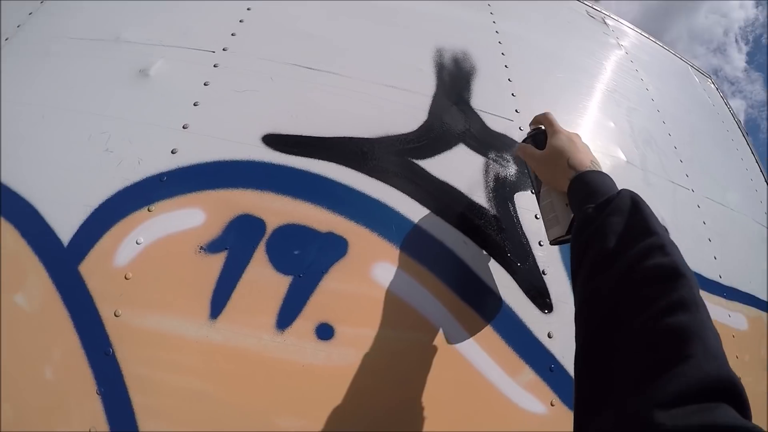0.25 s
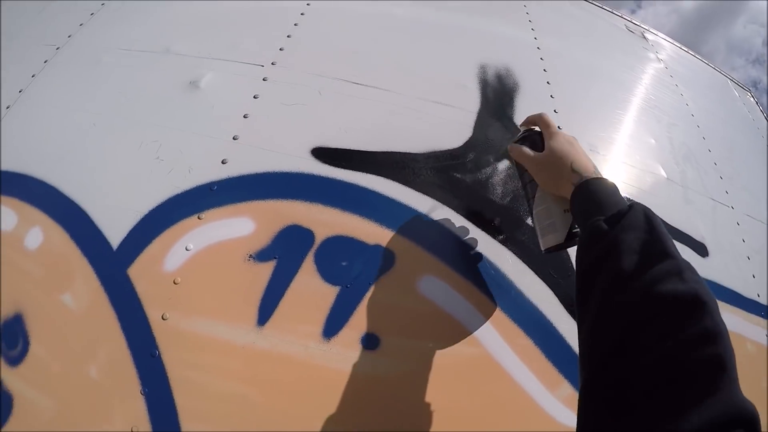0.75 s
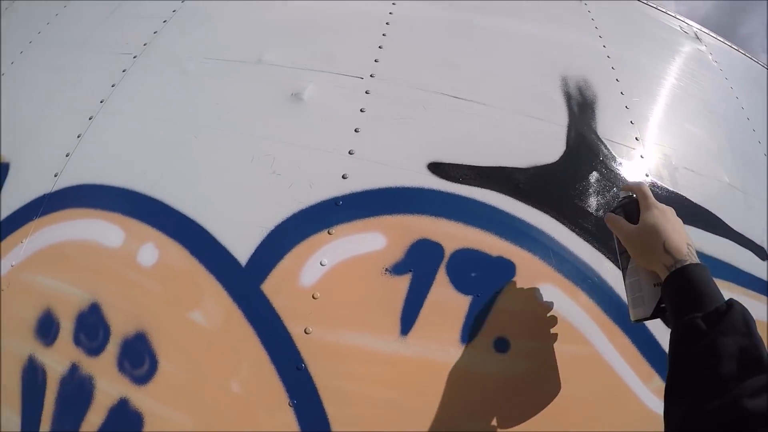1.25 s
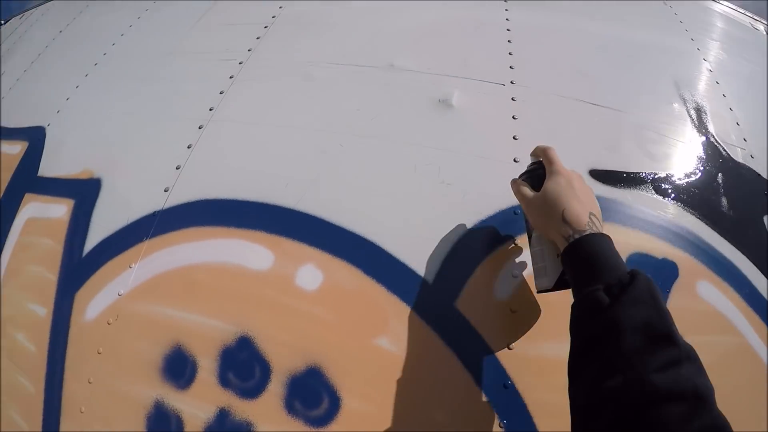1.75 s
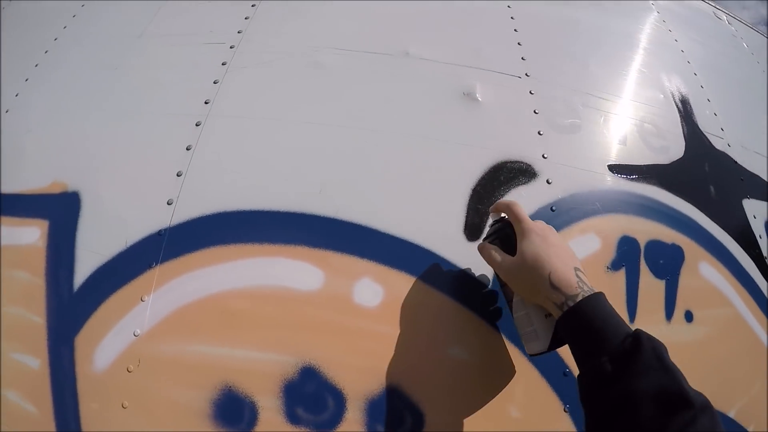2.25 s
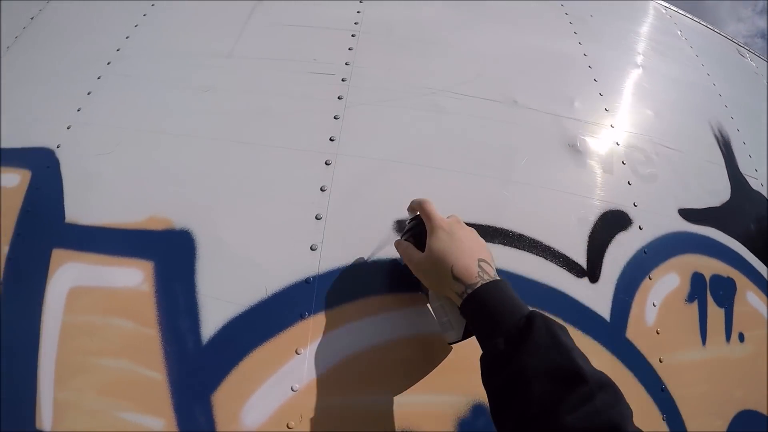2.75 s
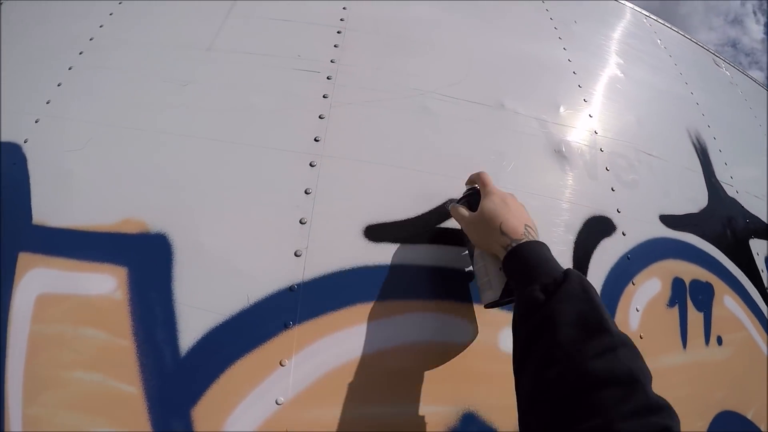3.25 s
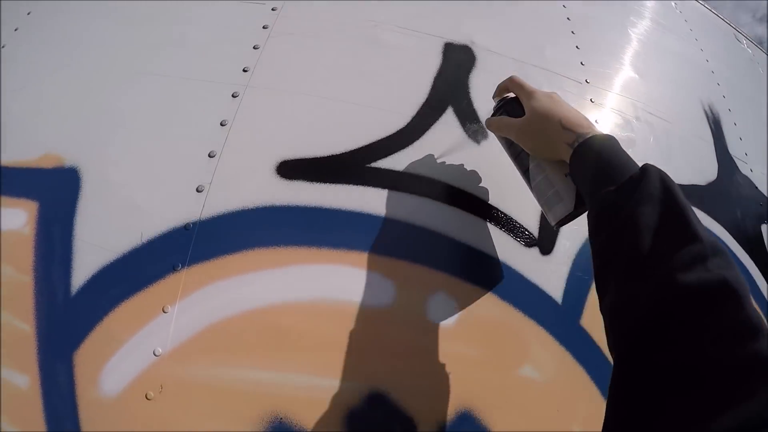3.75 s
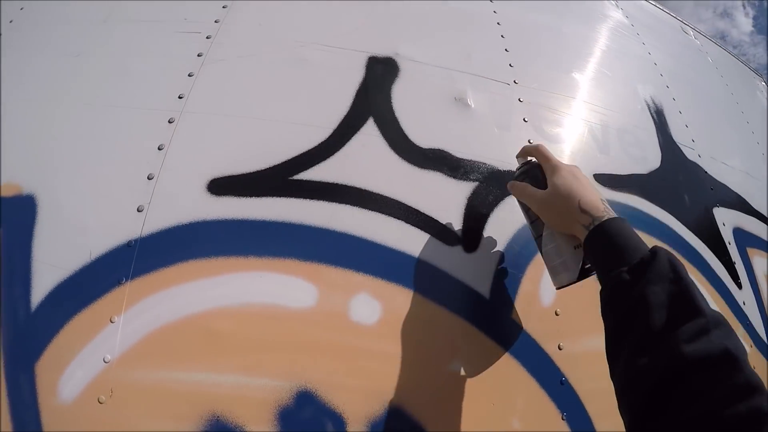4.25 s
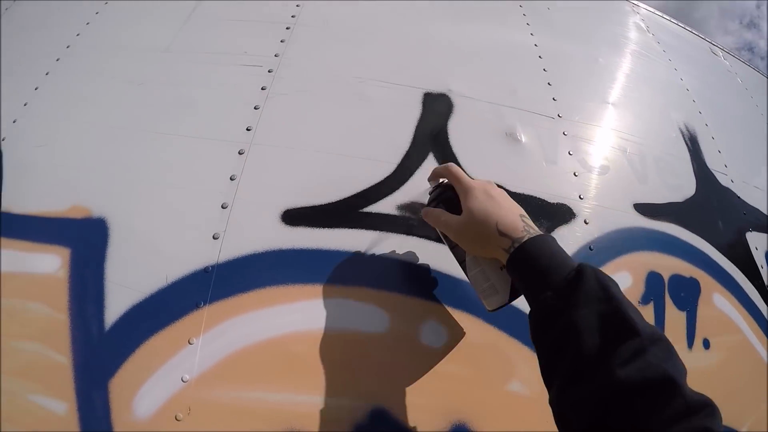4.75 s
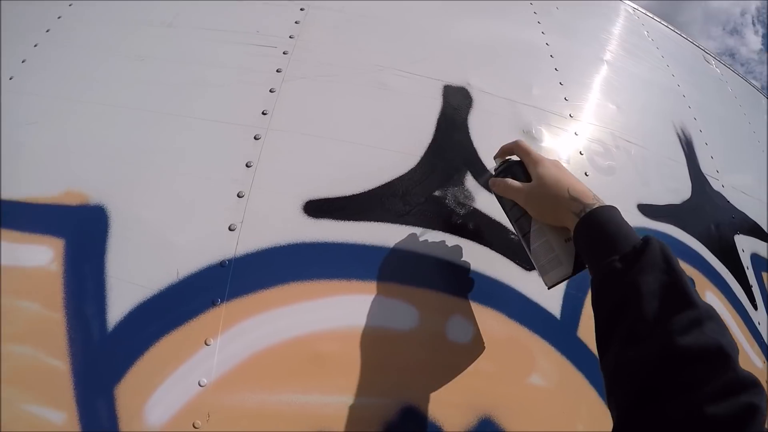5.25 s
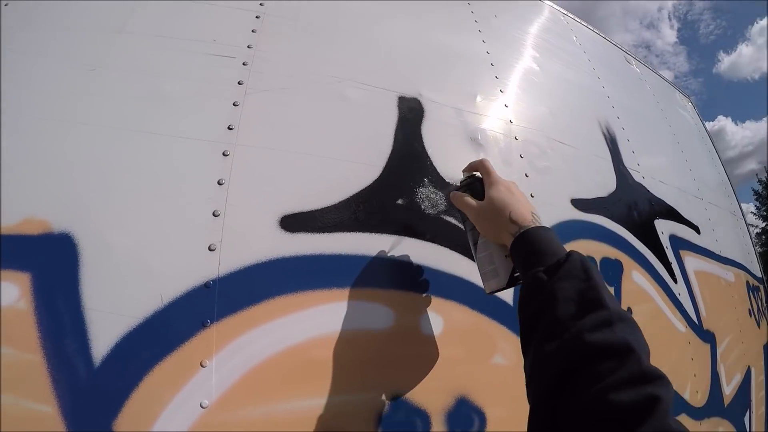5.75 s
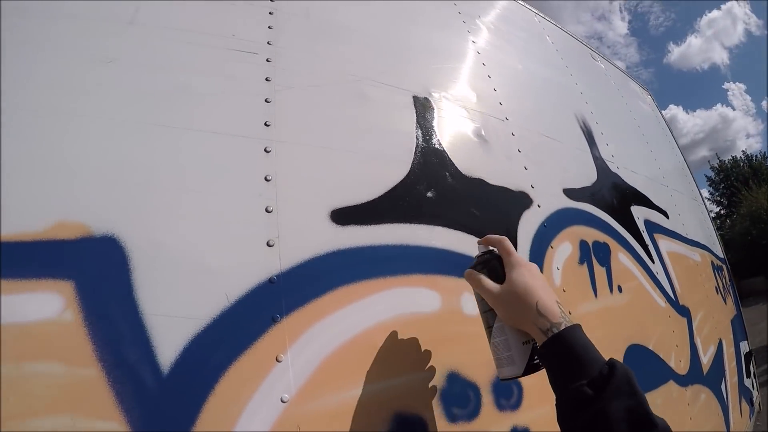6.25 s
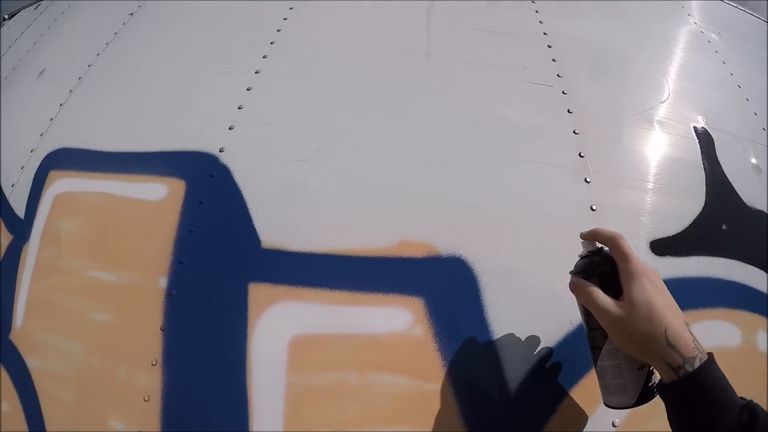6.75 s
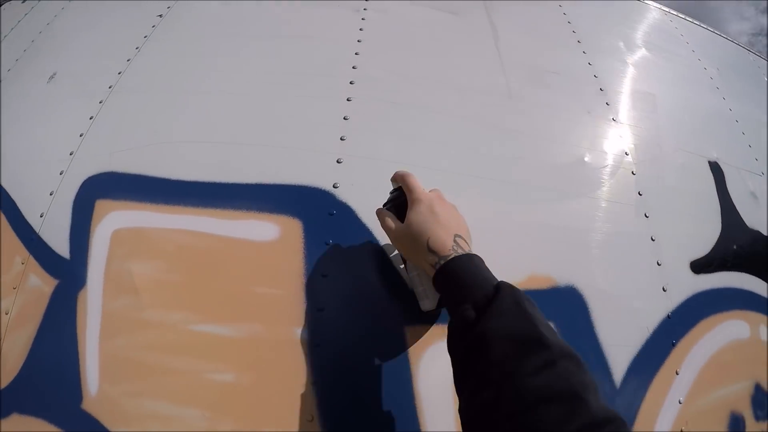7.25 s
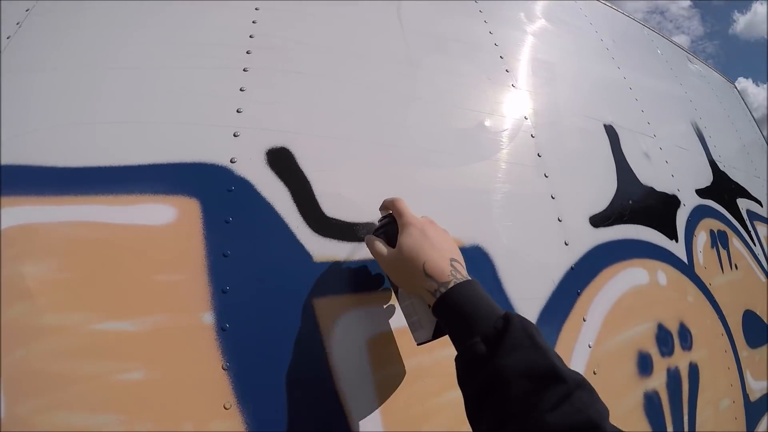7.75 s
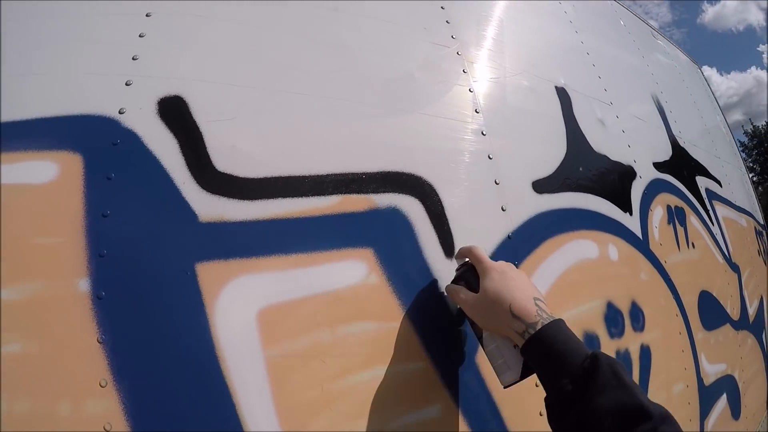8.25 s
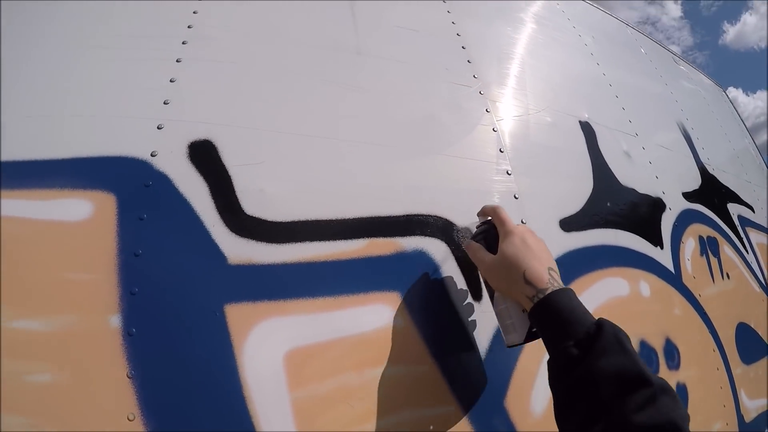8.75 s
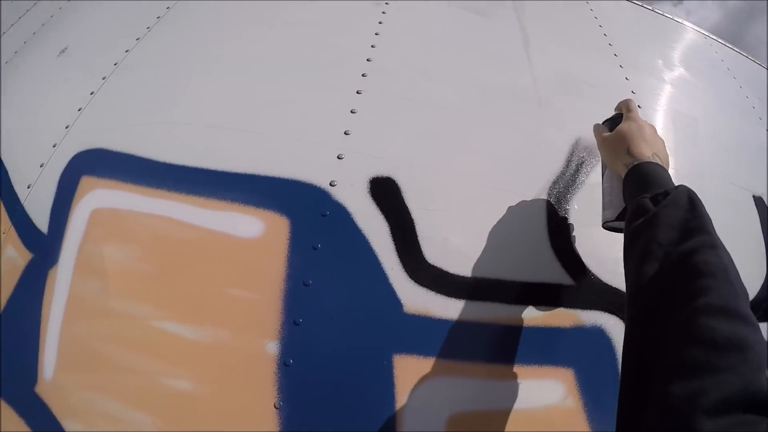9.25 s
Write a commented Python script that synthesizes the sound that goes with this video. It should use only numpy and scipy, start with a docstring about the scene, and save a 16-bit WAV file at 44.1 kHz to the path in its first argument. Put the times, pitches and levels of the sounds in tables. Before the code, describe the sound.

Repeated hisses of spray paint against a metal wall, with light can rattles and wind rumbling on the microphone.

```python
"""A spray can hisses in seven strokes, its turbulent jet close to a sheet-metal wall.
Echoes off wall, hand, arm and body interfere with the direct hiss and colour it as the hand moves.
The mixing ball strikes the can and excites the modes of its shell. All is heard by a small camera
in a resonant, closed housing, on which wind rumbles and two soft bumps land, over a faint outdoor wash."""
import sys
import numpy as np
from scipy import signal
from scipy.fft import rfft, irfft, next_fast_len
from scipy.io import wavfile
from scipy.ndimage import uniform_filter1d, map_coordinates

SR = 44100
rng = np.random.default_rng(int(sys.argv[2]) if len(sys.argv) > 2 else 0)


def pcm_store(signal):
    """Save signal as 16-bit PCM."""
    levels = np.round(np.clip(np.atleast_2d(signal), -1, 1) * 32767)
    wavfile.write(sys.argv[1], SR, levels.astype(np.int16).T)


N = 419832
FRAME = 512  # samples per short-time spectrum

# Strength of the wind's buffeting: (time [s], level [dB])
GUSTS = [(0.0, -36), (1.59, -32.5), (1.72, -25.5), (1.99, -25.5), (2.01, -36), (2.38, -32.5), (3.29, -37),
         (3.34, -26), (4.4, -37.5), (6.34, -33), (6.389, -20), (6.81, -38.5), (7.08, -21), (7.19, -33.5),
         (7.5, -30.5), (8.99, -42), (9.25, -22.5), (9.52, -34.5)]


def amp(db):
    """Decibels to amplitude ratio."""
    return 10 ** (np.asarray(db) / 20)


def unit(x):
    """Normalisation to an rms of 1."""
    return x / np.sqrt(np.mean(x ** 2) + 1e-20)


def along(points, hz):
    """Interpolation of (frequency [Hz], value) points on a logarithmic frequency axis."""
    f, v = np.transpose(points)
    return np.interp(np.log(hz + 1), np.log(f + 1), v)


def curve(s, values):
    """Linear interpolation in time, one value per sample."""
    return np.interp(np.arange(N) / SR, s, values)


def wobble(rate):
    """Spline interpolation of random knots, `rate` of them a second."""
    return map_coordinates(rng.standard_normal(int(N * rate / SR) + 4), [np.arange(N) * rate / SR])


def filtered(x, response):
    """Linear filtering: the spectrum of x times a frequency response."""
    m = 2 * next_fast_len(N // 2 + 4096)
    return irfft(rfft(x, m) * response(np.fft.rfftfreq(m, 1 / SR)), m)[..., :N]


def causal(gain):
    """Minimum-phase response with this gain: it rings only after its excitation."""
    cepstrum = irfft(np.log(gain + 1e-6))
    cepstrum[1:len(cepstrum) // 2] *= 2
    cepstrum[len(cepstrum) // 2 + 1:] = 0
    return np.exp(rfft(cepstrum))[:len(gain)]


def patchy_noise(depth_db, bins, frames):
    """Short-time spectrum of noise, amplitude-modulated in random patches of time and frequency."""
    hz, t, spectrum = signal.stft(rng.standard_normal(N), SR, nperseg=FRAME)
    field = rng.standard_normal(spectrum.shape)
    for _ in range(2):
        field = uniform_filter1d(uniform_filter1d(field, bins, 0), frames, 1)
    return hz, t, spectrum * amp(depth_db * unit(field))


def echo(hz, delay_ms):
    """A delay is a phase lag proportional to frequency; one column per delay."""
    return np.exp(-2j * np.pi * hz[:, None] * delay_ms / 1000)


def housing(hz):
    """Resonances and antiresonances of the camera housing lift or thin the sound around them."""
    # Peaks and dips: (centre [Hz], width [Hz], gain [dB])
    resonances = [(1600, 195, 11.5), (2160, 60, -22), (2366, 122, 9.5), (3128, 122, -10.5),
                  (4175, 170, -9.5), (4546, 63, 6), (4750, 195, -9.5), (5214, 82, -21), (5280, 230, 9.5),
                  (5820, 940, -7.5), (7740, 540, 6.5), (11100, 180, 6)]
    return amp(sum(db / (1 + (2 * (hz - centre) / width) ** 2) for centre, width, db in resonances))


def reflections(hz, t):
    """Comb filtering: short echoes interfere with the direct sound, and the notches move with the hand."""
    # Wall echo as the nozzle nears, leaves and turns: (time [s], delay [ms], treble amplitude [ratio])
    wall_path = [(0, 0.27, 0.27), (.18, 0.37, 0.47), (.4, 0.41, 0.65), (1.12, .43, 0.47),
                 (1.97, 0.39, 0.36), (2.18, 0.41, 0.077), (2.5, 0.18, 0.58), (2.65, 0.24, 0.35),
                 (2.85, 0.29, 0.6), (3.15, 0.29, 0.79), (3.38, 0.19, .3), (3.48, 0.31, 0.3),
                 (4.11, 0.31, 0.95), (4.39, 0.35, 0.27), (4.6, 0.378, 0.8), (4.9, 0.4, 0.78),
                 (5.07, 0.35, 0.26), (5.2, 0.39, 0.26), (5.5, 0.41, 0.5), (5.7, 0.518, 0.97),
                 (5.95, 0.33, 0.48), (7.5, 0.46, 0.52), (7.64, 0.26, 0.55), (8.15, 0.28, 0.56),
                 (8.31, .19, .75), (8.78, 0.27, 0.56), (9.1, 0.23, 0.18), (9.3, 0.45, .02), (9.52, .48, 1)]
    # Echo off the hand that holds the can: (time [s], delay [ms], amplitude [ratio])
    hand_path = [(0, 0.16, 0.13), (2.85, .14, 0.19), (3.33, 0.14, .05), (3.38, 0.051, 0.14),
                 (3.56, 0.087, 0.28), (3.66, 0.18, 0.24), (4.11, 0.16, 0.32), (4.39, 0.55, 0.28),
                 (5.07, 0.51, 0.2), (5.2, 0.41, 0.28), (5.5, 0.45, 0.17), (5.7, 0.14, .02),
                 (5.95, .12, 0.37), (7.5, 0.092, 0.26), (8.31, .135, 0.18), (9.15, 0.088, 0.032),
                 (9.42, 0.11, 0.38)]
    at = np.clip(np.round(t * SR).astype(int), 0, N - 1)
    wall_s, *wall_columns = np.transpose(wall_path)
    wall_ms, wall_share = (np.interp(t, wall_s, column) for column in wall_columns)
    wall_ms += 0.008 * wobble(7)[at]  # hand tremor
    hand_s, *hand_columns = np.transpose(hand_path)
    hand_ms, hand_share = (np.interp(t, hand_s, column) for column in hand_columns)
    shade = 1 / (1 + (2200 / (hz[:, None] + 1)) ** 2)  # the hand shades the wall echo's long waves
    paths = 1 + wall_share * shade * echo(hz, wall_ms) + hand_share * echo(hz, hand_ms)
    treble = 1 / (1 + (5000 / (hz[:, None] + 1)) ** 4)
    # Arm and body return only short waves, over longer paths that drift.
    for mean_ms, sway_ms, share in [(0.68, 0.03, 0.25), (0.85, 0.04, 0.24), (1.3, 0.06, 0.22)]:
        paths += share * treble * echo(hz, mean_ms + sway_ms * wobble(3)[at])
    return paths


def spray():
    """A turbulent jet radiates broadband noise while the valve is open; echoes and housing colour it."""
    # Jet spectrum: (frequency [Hz], relative spectral level [dB])
    nozzle = [(710, -39), (1200, -33), (3630, 0.5), (5870, -4.5), (7660, -9), (15300, -13)]
    # Valve timing of each stroke: (fully open [s], shuts [s])
    valve = [(-.05, 1.128), (1.965, 2.182), (2.499, 2.845), (3.149, 4.11), (4.386, 5.955), (7.508, 8.31),
             (8.776, 10)]
    # Each stroke: (press duration [s], start level [dB], end level [dB], tilt [dB/octave])
    strokes = [(.027, -47, -46, 0), (0.052, -48, -45.5, 0), (0.032, -46, -47.5, 0),
               (0.033, -47.5, -47, -0.8), (0.026, -46.5, -47.5, 0.5), (0.023, -47, -46.5, -0.8),
               (0.049, -44, -52, 0.2)]
    open_s, shut_s = np.transpose(valve)
    press_s, start_db, end_db, tilt_db = np.transpose(strokes)
    hz, t, noise = patchy_noise(depth_db=1.0, bins=5, frames=24)
    stroke = np.clip(np.searchsorted(shut_s + 0.1, t), 0, len(strokes) - 1)
    tilt = amp(np.log2(np.clip(hz[:, None], 1500, None) / 5000) * tilt_db[stroke])
    jet = signal.istft(noise * reflections(hz, t) * tilt, SR, nperseg=FRAME)[1][:N]
    jet = unit(filtered(jet, lambda f: amp(along(nozzle, f)) * housing(f)))
    now, flow = np.arange(N) / SR, 0
    for full, press, shuts in zip(open_s, press_s, shut_s):
        travel = (now - full) / press
        opening = amp(21 * np.minimum(travel, 0)) * (travel > -1.4)  # a leak swells into the jet
        closing = np.clip((shuts - now) / 0.03 + 0.7, 0, 1) ** 2
        flow += opening * closing
    level_db = curve(np.ravel(valve), np.ravel([start_db, end_db], "F"))
    sputter_db = 0.8 * wobble(60) + 0.8 * wobble(18)  # droplets make the flow uneven
    return jet * flow * amp(level_db + sputter_db)


def wind():
    """Slow pressure fluctuations on the housing rumble; gusts lift the lowest frequencies most."""
    # Pressure spectrum: (frequency [Hz], relative spectral level [dB])
    pressure = [(7.1, -50), (12, 0), (27, 1), (47, -1.5), (72, -10.5), (124, -30), (250, -53.5), (320, -52),
                (550, -120)]
    s, db = np.transpose(GUSTS)
    gust_db, mean_db = curve(s, db), np.mean(db)
    rumble = unit(filtered(rng.standard_normal(N), lambda f: amp(along(pressure, f))))
    deep = filtered(rumble, lambda f: 1 / (1 + (f / 60) ** 4))
    return deep * amp(gust_db) + (rumble - deep) * amp(mean_db + 0.16 * (gust_db - mean_db))


def outdoors():
    """Distant ambient noise: gusts and rustles modulate its low part while the treble stays nearly even."""
    # Ambient spectrum: (frequency [Hz], relative spectral level [dB])
    ambient = [(120, -12.5), (200, -2), (300, -4), (1100, -8), (1580, -7), (2300, -10), (7270, -19),
               (13800, -23.5), (14400, -14), (15100, -37)]
    # Short swells of the wash: (time [s], half duration [s], lift [dB])
    rustles = [(0.319, 0.0035, 11.5), (1.744, 0.029, 5.5), (5.937, 0.057, 10), (6.525, 0.065, 2),
               (7.064, 0.16, 2)]
    s, db = np.transpose(GUSTS)
    hz, t, noise = patchy_noise(depth_db=1.67, bins=4, frames=8)
    swell_db = 0.17 * np.interp(t, s, db - np.mean(db))
    swell_db += sum(lift_db * np.exp(-((t - at) / half) ** 2) for at, half, lift_db in rustles)
    swell = amp(swell_db / (1 + (hz[:, None] / 2500) ** 2))
    wash = signal.istft(noise * swell, SR, nperseg=FRAME)[1][:N]
    return amp(-62.5) * unit(filtered(wash, lambda f: amp(along(ambient, f))))


def rattle():
    """Impact excitation: each blow of the ball gives a dry crack and rings the shell's damped modes."""
    # Ball on the can wall: (time [s], relative level [dB], relative treble level [dB], pitch [Hz])
    blows = [(0.434, -29, -46, 3900), (0.4484, -25, -39, 3620), (0.4584, -28, -34, 4100),
             (0.474, -26, -55, 3990), (0.6731, -29, -39, 2777), (0.6974, -18, -38, 4260),
             (0.7084, -16.5, -42, 4350), (0.716, -20.5, -38, 4440), (0.7216, -18.5, -37, 3680),
             (0.7522, -28, -55, 2900), (0.8814, -23, -48, 3460), (0.892, -21.5, -54, 4100),
             (0.9106, -23, -44, 3450), (0.9408, -25.5, -32, 3240), (1.097, -27.5, -46, 2980),
             (1.1284, -27, -34, 4500), (1.142, -28.5, -50, 2480), (1.166, -31.5, -39.5, 3460),
             (1.1857, -36, -55, 2710), (1.2052, -33, -57, 4400), (1.2171, -34.5, -62, 3200),
             (1.232, -37.5, -49, 3500), (1.2527, -35, -53, 2800), (1.3114, -36, -41.5, 3400),
             (1.466, -34, -62, 3160), (1.652, -43, -68, 3000), (1.668, -39.5, -56, 3200),
             (1.73, -28.5, -31.5, 2690), (1.74, -23.5, -42, 3570), (1.7775, -37, -44, 3630),
             (1.8073, -39, -50, 3680), (1.8216, -35, -50, 3120), (1.8324, -32, -41, 3750),
             (1.8624, -30.5, -40, 3640), (1.878, -29.5, -44, 3600), (1.931, -35, -53, 1650),
             (2.2434, -32.5, -54, 3820), (4.139, -42, -70, 1600), (4.2592, -44.5, -50.5, 2600),
             (5.8174, -26, -40, 3330), (5.946, -34, -47, 3480), (5.97, -35.5, -56, 3340),
             (6.0326, -37, -51, 1580), (6.0444, -35.5, -62, 3470), (6.2523, -39, -52, 2670),
             (6.708, -44, -50, 3690), (7.093, -42, -58, 1890), (8.3794, -45, -56, 3210),
             (8.668, -49, -60, 3300)]
    # Modes of the shell: (frequency [Hz], relative level [dB], 60 dB decay time [s])
    modes = [(1600, -24, .06), (2550, -19, 0.03), (3190, -12, 0.035), (3620, -11, 0.05), (3940, -12, 0.05),
             (4510, -16, 0.04), (7000, -13, .025), (7640, -13, 0.02)]
    spread, off_pitch_db = 1.425, 14  # crack's band edge over its pitch; mode loss per octave off pitch
    out, t = np.zeros(N + SR), np.arange(SR // 5) / SR
    noises = rng.standard_normal((len(blows), 2, len(t)))
    spots_db = 4 * rng.standard_normal((len(blows), len(modes)))  # each blow lands on another spot
    detunings = 1 + 0.025 * rng.standard_normal(spots_db.shape)  # the changing grip shifts the modes
    sharp = signal.butter(2, [5500, 9500], "band", fs=SR, output="sos")
    attack = 1 - np.exp(-t / 0.00047)
    decay = amp(-60 * t / 0.018) + amp(-16.5 - 60 * t / 0.14)
    for (s, db, treble_db, pitch_hz), (low, high), spots, shifts in zip(blows, noises, spots_db, detunings):
        dull = signal.butter(2, [pitch_hz / spread, pitch_hz * spread], "band", fs=SR, output="sos")
        crack = amp(db - 8.5) * unit(signal.sosfilt(dull, low))
        crack += amp(treble_db - 6.5) * unit(signal.sosfilt(sharp, high))
        ring = 0
        for (hz, mode_db, t60), spot_db, shift in zip(modes, spots, shifts):
            start_db = db + mode_db + spot_db - off_pitch_db * abs(np.log2(hz / pitch_hz))
            ring += amp(start_db - 60 * t / t60) * np.sin(2 * np.pi * hz * shift * t)
        out[round(s * SR):][:len(t)] += attack * (decay * crack + ring)
    # A milder share of the housing's colour, and a high-pass at 1300 Hz.
    return filtered(out[:N], lambda hz: causal(housing(hz) ** 0.61 * hz ** 4 / (hz ** 4 + 1300 ** 4)))


def bumps():
    """Soft impacts on the housing each excite a heavily damped 140 Hz oscillation."""
    # Bumps: (time [s], relative level [dB])
    thuds = [(6.167, -34.5), (6.725, -42.5)]
    out, t = np.zeros(N), np.arange(SR // 10) / SR
    thud = (1 - np.exp(-t / 0.0035)) * amp(7 - 60 * t / 0.044) * np.sin(2 * np.pi * 140 * t)
    for s, db in thuds:
        out[round(s * SR):][:len(t)] += amp(db) * thud
    return out


def scene():
    """Superposition: the pressures of all sources add at one microphone."""
    return (spray() + rattle() + wind() + outdoors() + bumps())[None]


def record(dry):
    """Band limiting: the camera passes nothing above its cutoff."""
    cutoff_hz = 15420
    return filtered(dry, lambda hz: np.clip((cutoff_hz - hz) / 250, 0, 1) ** 2)


dry = scene()
out = record(dry)
pcm_store(out)
```